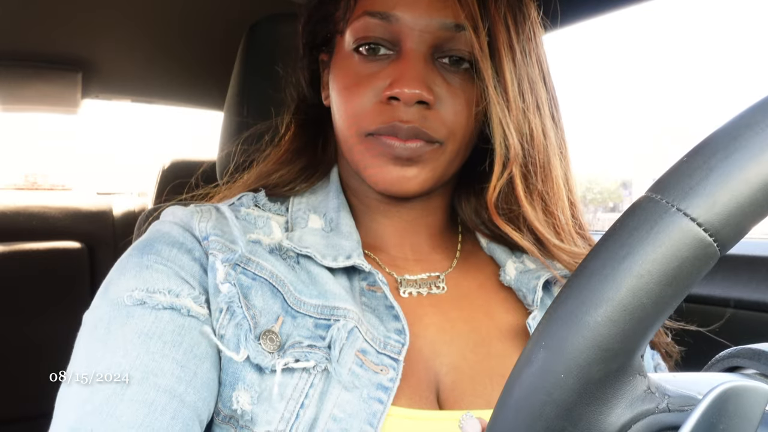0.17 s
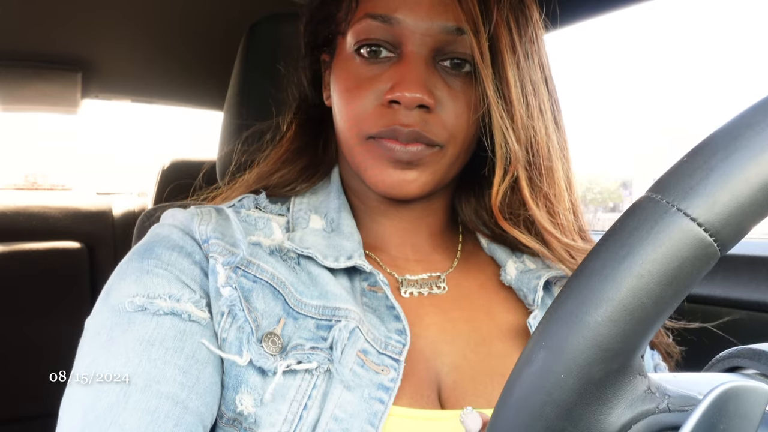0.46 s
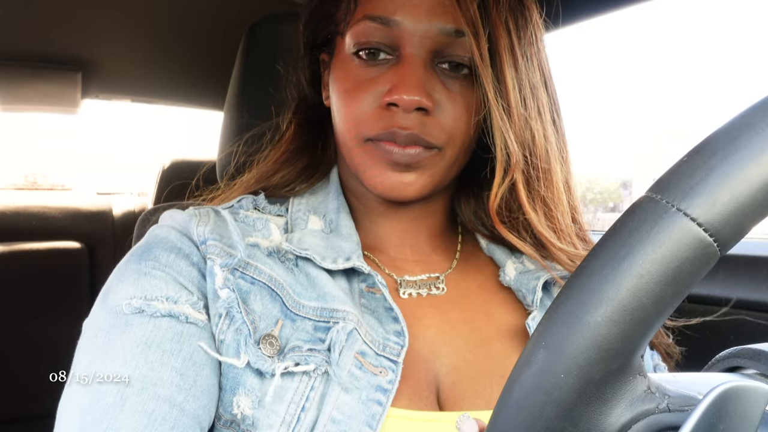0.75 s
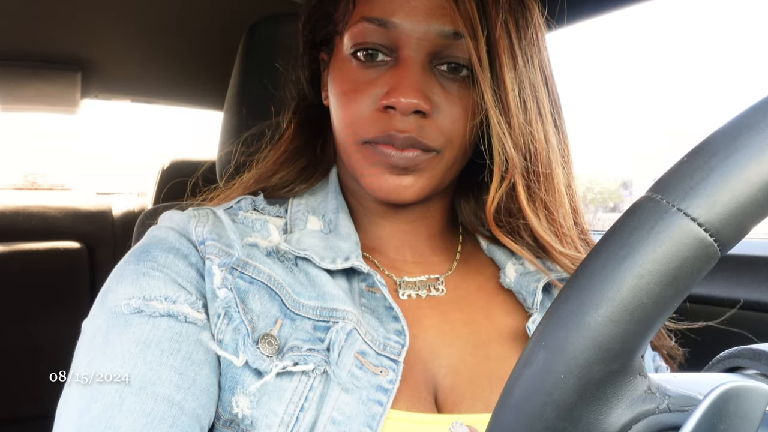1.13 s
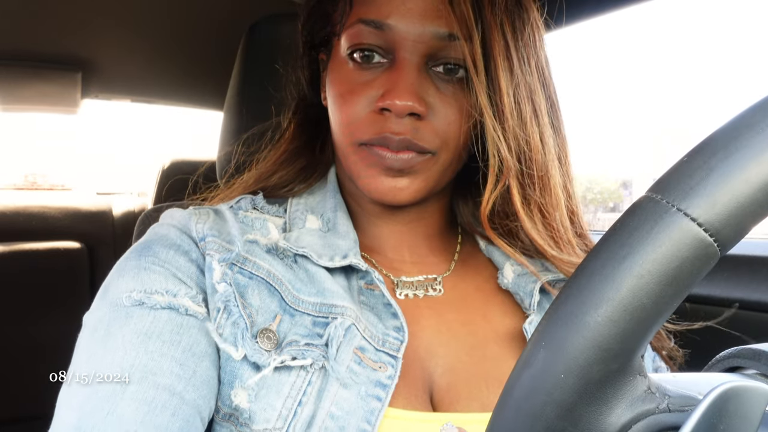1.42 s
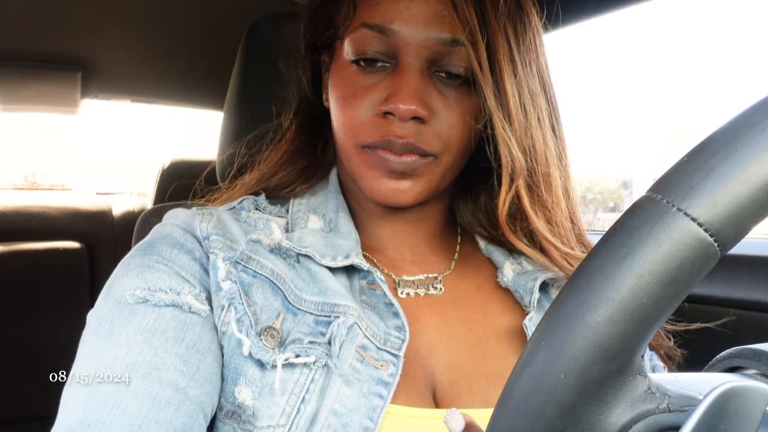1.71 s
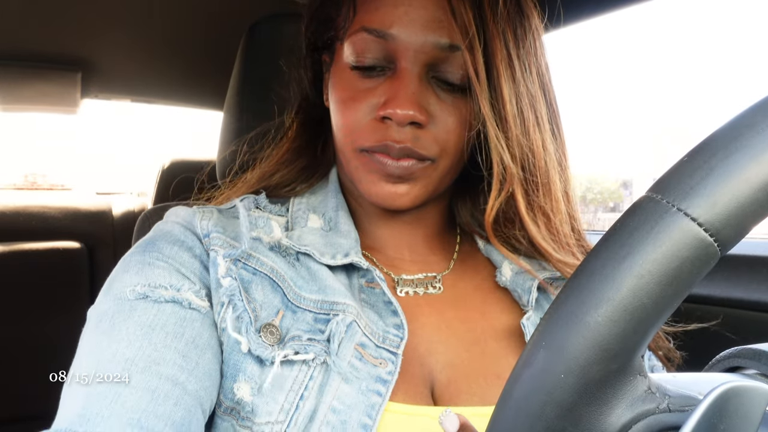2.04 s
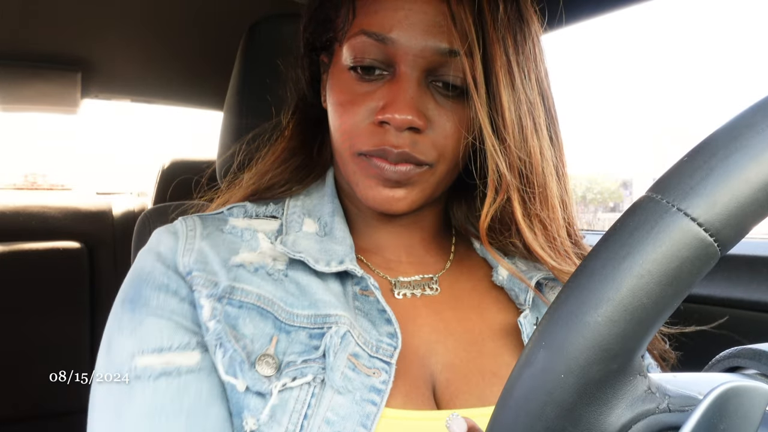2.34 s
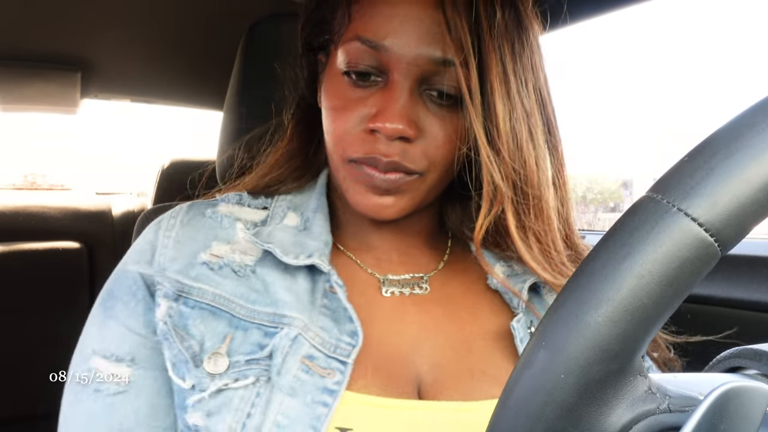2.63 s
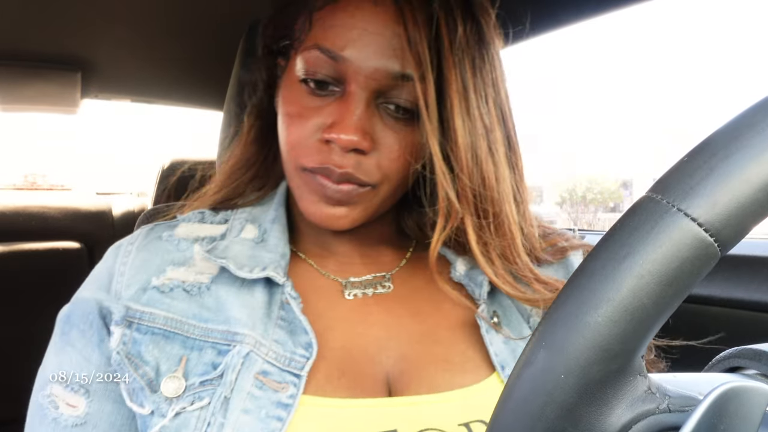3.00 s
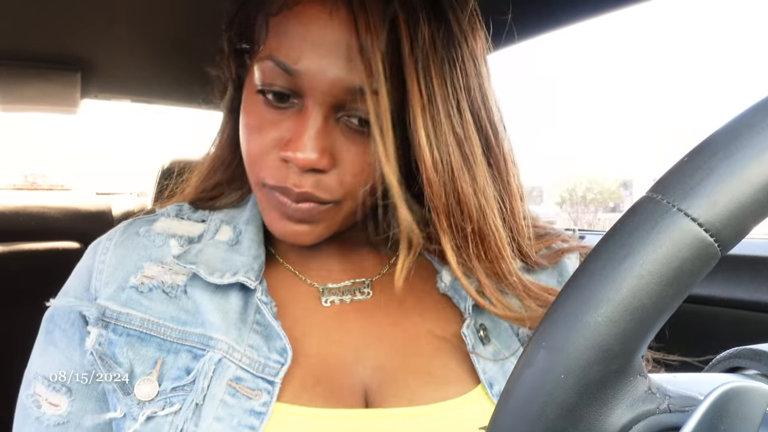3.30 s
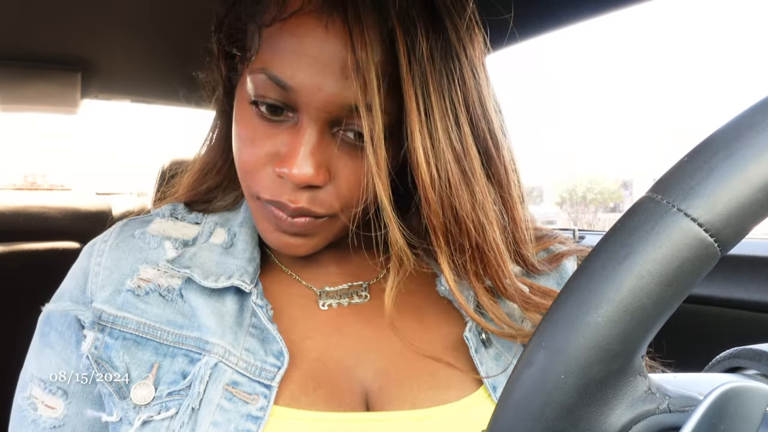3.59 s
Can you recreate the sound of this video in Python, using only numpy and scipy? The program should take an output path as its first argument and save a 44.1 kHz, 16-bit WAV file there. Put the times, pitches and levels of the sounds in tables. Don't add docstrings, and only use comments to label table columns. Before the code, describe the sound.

Steady airy whoosh of a car's vent fan in a closed cabin, with faint small clicks

```python
import sys
import numpy as np
from scipy import signal
from scipy.fft import rfft, irfft
from scipy.io import wavfile
from scipy.ndimage import uniform_filter1d

SR = 44100
rng = np.random.default_rng(int(sys.argv[2]) if len(sys.argv) > 2 else 0)


def waveform_to_disk(signal):
    frames = np.transpose(np.atleast_2d(signal))
    scaled = np.clip(frames, -1, 1) * 32767
    samples = np.round(scaled).astype(np.int16)
    wavfile.write(sys.argv[1], SR, samples)


def volts_from_decibels(level):
    exponent = np.asarray(level, float) / 20
    return 10 ** exponent


N = 165375


def evened(x):
    return x / np.sqrt(np.mean(np.abs(x) ** 2) + 1e-20)


def read(points, hz):
    f, value = np.transpose(points)
    return np.interp(np.log(hz + 1), np.log(f + 1), value)


def bumps(table, hz):
    return sum(db * np.exp(-((hz - f) / width) ** 2) for f, width, db in table)


def add(mix, start_s, sound):
    part = mix[:, round(start_s * SR):][:, :sound.shape[1]]
    part += sound[:, :part.shape[1]]


def drift(top_hz):
    t = np.arange(0, N + 64, 64) / SR
    slow = 0
    for f in np.geomspace(top_hz / 20, top_hz, num=20):
        slow = slow + np.sin(2 * np.pi * (f * t + rng.random())) / np.sqrt(f)
    return np.repeat(evened(slow), repeats=64)[:N]


def rush(hz):
    real, imag, patches = rng.standard_normal((N // 1024 + 6, len(hz), 3)).T
    patches = uniform_filter1d(patches, size=40, axis=0)
    patches = evened(uniform_filter1d(patches, size=3, axis=1))
    patch_db = 0.36
    return evened((real + 1j * imag) * volts_from_decibels(patch_db * patches))


def surges_db(frames):
    # time_s, level_db
    buffet = [(0.0, -33), (0.22, -36), (0.43, -29), (0.55, -35.5), (0.67, -26), (0.76, -31.5), (0.95, -31),
              (1.1, -34.5), (1.5, -31), (1.66, -38), (1.9, -29.5), (2.2, -31.5), (2.37, -35), (2.5, -30.5),
              (2.63, -35), (2.8, -30.5), (3.15, -33.5), (3.75, -31)]
    when_s, level_db = np.transpose(buffet)
    t = (np.arange(frames) - 2) * 1024 / SR
    surge_db = np.interp(t, when_s, level_db)
    return surge_db - surge_db.mean()


def air():
    # frequency_hz, density_db
    air_colour = [(15, -71), (25, -32.5), (99, -7.5), (178, -3), (508, -9.5), (551, -9.5), (2000, -15.5),
                  (5720, -31), (15500, -66)]
    # frequency_hz, density_db
    side_colour = [(59, -53), (100, -30), (237, -6.5), (466, -5), (588, -4.5), (1310, -4), (1460, -6.5),
                   (4750, -16), (15500, -47)]
    # frequency_hz, width_hz, gain_db
    resonances = [(35, 8.9, -13), (102.6, 24, 3), (127, 7, 0), (181.5, 23.2, 5), (382, 16, 2.5), (427, 30, -2.5),
                  (568, 8, 4), (640, 123, -2.5), (910, 257, 3.5), (1220, 120, -4.5), (1590, 57, 4.5),
                  (1690, 20, -13), (1970, 72, 4.5), (2264, 97, -3.5), (2500, 180, 0), (2962, 83, -5),
                  (3430, 180, 2),
                  (3574, 116, -4), (3910, 220, 3), (4300, 80, 0), (4560, 66, 4), (4785, 96, 4.5), (4940, 80, -4),
            (5220, 100, 3.5), (5600, 56, -3), (5670, 60, 6.5), (7000, 280, -1), (8100, 250, 2.5),
            (9900, 200, 3.5), (10500, 300, 3), (13300, 300, -2)]
    # frequency_hz,
    # width_hz, gain_db
    across = [(250, 30, 1.5), (770, 80, 3.5), (1320, 80, -6), (1460, 64, 9), (1640, 50, 10),
              (1850, 60, 6.5), (2030, 50, 8), (2400, 120, -2), (2700, 150, 5.5), (2950, 80, -4),
              (4720, 200, 5), (14500, 2700, -7), (5650, 100, 12), (6100, 80, -3)]
    # frequency_hz, difference_db
    lean_table = [(60, -4), (130, -0.5), (290, 0.5), (640, -1), (1410, 0.5), (3100, 1.5), (6820, -2),
                  (15000, 0.5)]
    air_db, side_db, ripple_db = -25.5, -38.5, 0.75
    boom_hz, boom_width_hz = 190, 90
    swell_db, flicker_db = 0.12, 0.45

    hz = np.fft.rfftfreq(4096, 1 / SR)
    ripple, shift = rng.standard_normal((2, len(hz)))
    ripple = evened(uniform_filter1d(ripple, size=4)) * np.minimum(hz / 1500, 1)
    shift = uniform_filter1d(uniform_filter1d(shift, size=24), size=24)
    shift = np.tanh(2 * evened(shift))

    common = rush(hz)
    share = np.clip(0.63 * shift, -1, 1)[:, None]
    apart = 1j * share * common + np.sqrt(1 - share ** 2) * rush(hz)

    mid_db = read(air_colour, hz) + bumps(resonances, hz) + ripple_db * ripple
    mid = evened(common * volts_from_decibels(mid_db)[:, None])
    boom = bumps([(boom_hz, boom_width_hz, 1)], hz)[:, None]
    mid = mid * volts_from_decibels(boom * surges_db(mid.shape[1]))
    apart_db = read(side_colour, hz) + bumps(across, hz)
    side = volts_from_decibels(side_db - air_db) * evened(apart * volts_from_decibels(apart_db)[:, None])

    lean = volts_from_decibels(read(lean_table, hz) * np.clip(hz / 300, 0, 1) ** 2 / 2)[:, None]

    def back(spectra):
        return signal.istft(spectra, nperseg=4096, noverlap=3072)[1][..., 2048:N + 2048]

    flicker = uniform_filter1d(drift(60), size=64)
    gusts = volts_from_decibels(air_db + swell_db * drift(2.47) + flicker_db * flicker)
    return gusts * back(np.array([mid * lean + side, mid / lean - side])) / np.std(back(mid))


def motor():
    # multiple, level_db (rms), side_minus_mid_db
    orders = [(2, -44, -40), (5, -48, -16), (11, -45, -13), (12, -46, -6)]
    shaft_hz, waver, flutter_db = 49.86, 0.003, 2.2
    turns = np.cumsum(shaft_hz * (1 + waver * drift(2.996))) / SR
    opposed = np.array([[1], [-1]])
    out = np.zeros((2, N))
    for multiple, db, side_db in orders:
        angle = 2 * np.pi * (round(multiple) * turns + rng.random())
        flutter = uniform_filter1d(drift(16), size=256)
        level = np.sqrt(2) * volts_from_decibels(db + flutter_db * flutter)
        out += level * (np.sin(angle) + opposed * volts_from_decibels(side_db) * np.cos(angle))
    return out


def tick(peak_db, low_hz, top_hz):
    # frequency_hz, level_db, t60_s
    modes = [(3400, 6, .007), (4600, 7, .008), (5500, 6, .006), (6900, 6, .009), (7900, 1, .005),
             (9300, -3, .006), (10500, 2, .008), (11800, -3, .006), (13100, -4, .006), (14300, -14, .004)]
    rise_s, bounce_s, bounce_db = 0.0004, 0.0013, 3
    tail_db, tail_t60_s = -15, 0.03
    t = np.arange(3000) / SR
    ring = np.zeros(len(t))
    for f, db, t60_s in modes:
        mode_hz = f * rng.uniform(.99, 1.01)
        ring += volts_from_decibels(db - 60 * t / t60_s) * np.sin(2 * np.pi * (mode_hz * t + rng.random()))
    ring = ring * np.minimum(t / rise_s, 1)

    tail = volts_from_decibels(tail_db - 60 * t / tail_t60_s) * rng.standard_normal((2, len(t)))
    tail = signal.fftconvolve(tail, ring[None, :200] / np.linalg.norm(ring))[:, :len(t)]

    second_tap = np.interp(t - round(bounce_s * SR) / SR, t, ring, left=0)
    ring = ring + volts_from_decibels(bounce_db) * second_tap
    band = signal.butter(3, [low_hz, top_hz], "band", fs=SR, output="sos")
    return volts_from_decibels(peak_db) * signal.sosfilt(band, ring / np.abs(ring).max() + tail)


def brush(length_s, level_db, grains_per_s, tilt_db):
    # frequency_hz, level_db
    cloth = [(2000, -12), (5000, 0), (7000, -3), (8800, -11), (10500, -9), (13000, -16), (15500, -23)]
    n = int(length_s * SR)
    chance, size, hiss = rng.random((3, 2, SR))[:, :, :n]
    caught = chance[0] < grains_per_s / SR
    grains = caught * volts_from_decibels(-3 * np.log(size[0] + 1e-2)) * np.sign(hiss[0] - .5)
    grains = evened(grains) + .7 * np.sqrt(12) * (hiss - .5)
    hz = np.fft.rfftfreq(n, 1 / SR)
    colour_db = read(cloth, hz) + tilt_db * np.log2((hz + 1) / 8000)
    coloured = irfft(rfft(grains) * volts_from_decibels(colour_db), n)
    stroke = np.sin(np.pi * np.arange(n) / n)
    return volts_from_decibels(level_db) * evened(coloured) * stroke


def scene():
    # start_s, peak_db, low_hz, top_hz
    ticks = [(1.0152, -29, 3000, 9500), (1.0558, -41, 4500, 10500), (1.0638, -39, 5000, 12500),
             (1.0708, -35, 3500, 14000), (1.0762, -42, 6000, 14500), (1.0845, -41, 6000, 13000),
             (1.0900, -39, 5000, 11000), (1.2600, -39, 6000, 13000), (1.3158, -18.5, 2500, 13300),
             (2.11, -45, 7000, 14000), (3.0600, -31.5, 6000, 11500), (3.1420, -32, 4000, 9500),
             (3.4065, -39.5, 7000, 13500)]
    # start_s, length_s, level_db (rms), grains_per_s, tilt_db (per octave)
    brushes = [
        (1.066, .03, -50, 3000, 1),
        (1.04, .065, -56, 3000, 0),
        (2.36, .42, -62, 9000, 7),
    ]
    mix = air() + motor()
    for start_s, *touch in ticks:
        add(mix, start_s, tick(*touch))
    for start_s, *stroke in brushes:
        add(mix, start_s, brush(*stroke))
    return mix


def top_cut(x):
    return signal.sosfilt(signal.butter(12, 15760, fs=SR, output="sos"), x)


def record(dry):
    return top_cut(dry)


dry = scene()
out = record(dry)
waveform_to_disk(out)
```